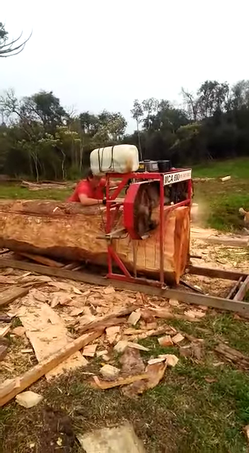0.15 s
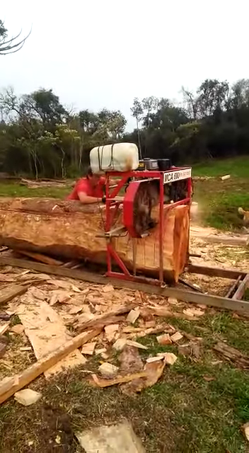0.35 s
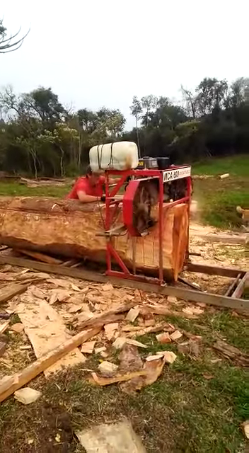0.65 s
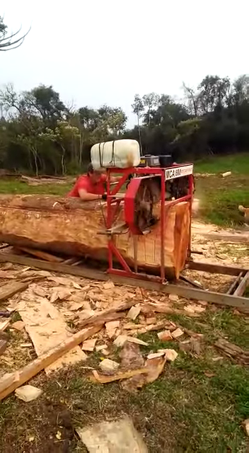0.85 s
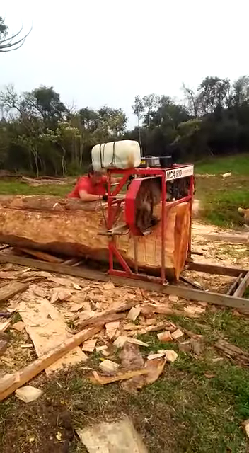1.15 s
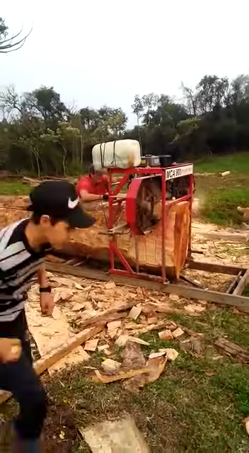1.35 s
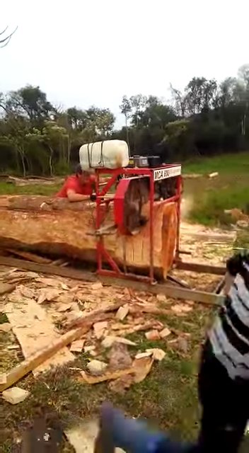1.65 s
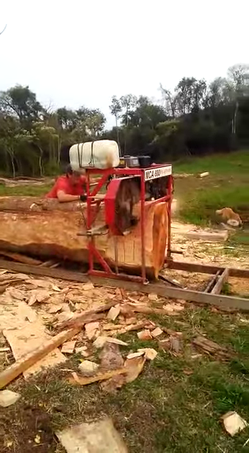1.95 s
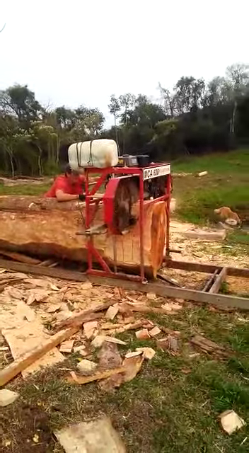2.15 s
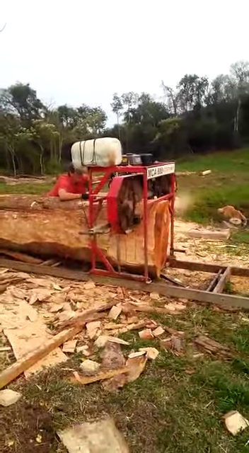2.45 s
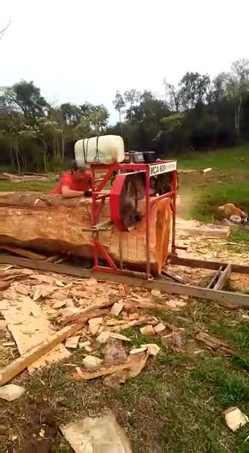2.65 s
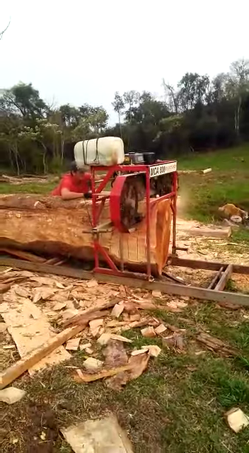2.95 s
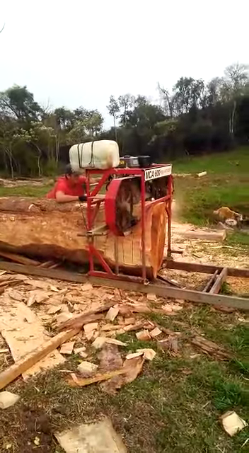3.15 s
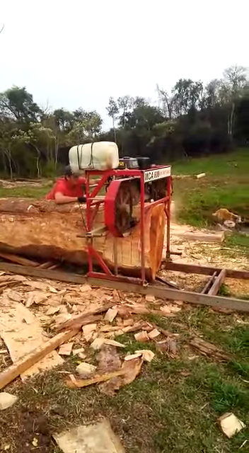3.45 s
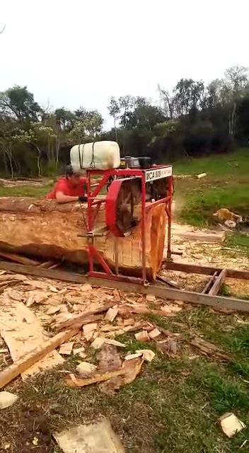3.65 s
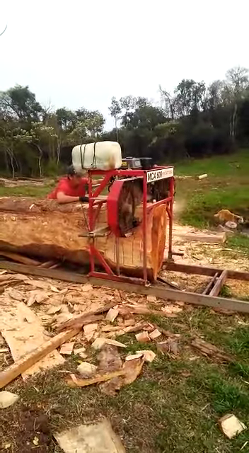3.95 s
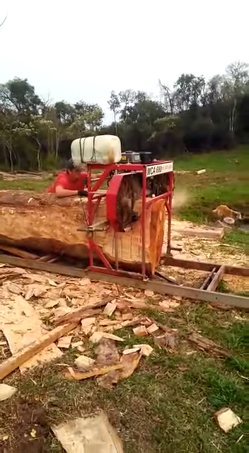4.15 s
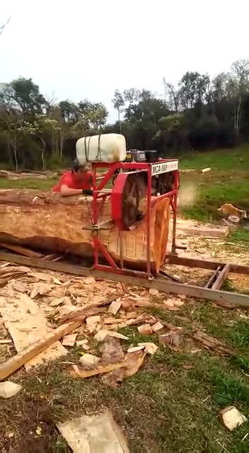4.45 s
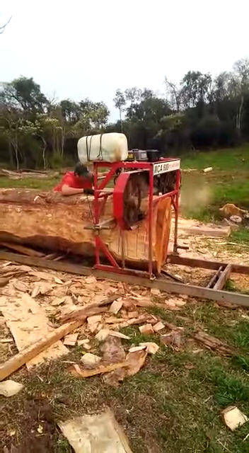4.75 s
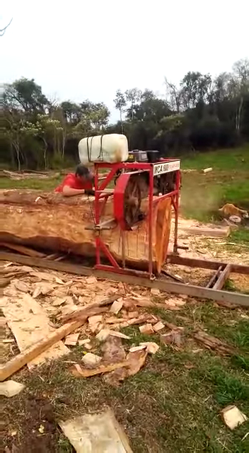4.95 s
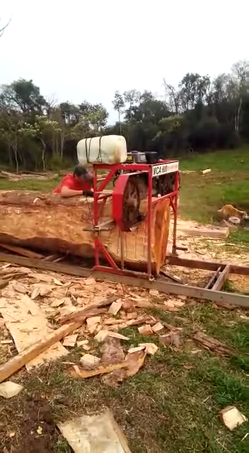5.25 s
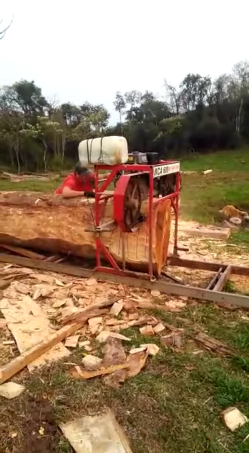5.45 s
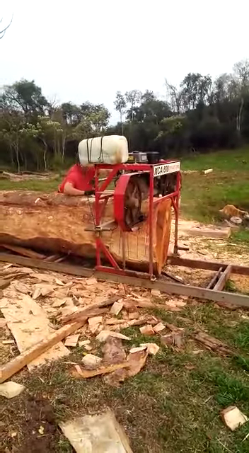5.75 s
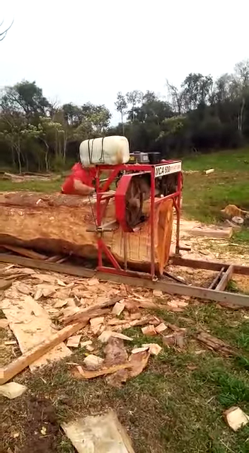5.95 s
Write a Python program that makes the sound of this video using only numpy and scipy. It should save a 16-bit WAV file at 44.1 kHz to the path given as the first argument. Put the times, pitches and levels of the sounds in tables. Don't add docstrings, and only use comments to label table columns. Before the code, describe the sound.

A petrol engine barks steadily under load outdoors while a saw blade rasps through a log, loose metal rattling and wind thumping the microphone.

```python
import sys
import numpy as np
from scipy import signal
from scipy.fft import rfft, irfft, next_fast_len
from scipy.io import wavfile
from scipy.ndimage import uniform_filter1d, map_coordinates

SR = 44100
rng = np.random.default_rng(int(sys.argv[2]) if len(sys.argv) > 2 else 0)


def bounce(signal):
    frames = np.transpose(np.atleast_2d(signal))
    limited = np.clip(frames, -1, 1)
    pcm = np.round(limited * 32767).astype(np.int16)
    wavfile.write(sys.argv[1], SR, pcm)


def volts_from_db(level):
    exponent = np.asarray(level, float) / 20
    return 10 ** exponent


N = 268569

# (frequency [Hz], density [dB per Hz])
BUFFET_SPECTRUM = [(20, -32), (45, -17), (70, -2.5), (170, -6), (320, -10.5), (600, -20.5), (1200, -69)]
# (time [s], peak level [dB], half width [s])
GUSTS = [(.11, -10.5, 0.041), (.27, -15, 0.024), (.66, -15.5, 0.049), (.82, -18, 0.046), (.97, -22, 0.031),
         (1.22, -34, 0.03), (1.47, -13, 0.092), (2.0, -29, 0.044), (2.35, -28, 0.11), (2.62, -24, 0.075),
         (2.91, -6.5, 0.043), (3.09, -12, 0.052), (3.3, -26, 0.097), (3.54, -15, 0.079), (3.76, -26, 0.082),
         (4.02, -14, 0.026), (4.23, -21, 0.037), (4.41, -10.5, 0.036), (4.71, -9.5, 0.064),
         (4.9, -17.5, 0.058), (5.23, -16, 0.059), (5.4, -23, 0.049), (5.78, -19, 0.13)]
# (time [s], peak level [dB], push +1 or suction -1 [-])
PUFFS = [(0.073, -18, -1), (.116, -16, -1), (0.129, -9, -0.89), (0.269, -8, -1), (0.655, -16, 1),
         (0.748, -6, -1), (.921, -10, -1), (0.946, -6, -1), (1.452, -5, 1), (1.537, -10, 1),
         (2.876, -9, -1), (2.901, -16, 1), (2.933, 0, -0.82), (2.942, -9, 1), (3.062, -11, -1),
         (3.085, -6, 1), (3.312, -14, 0.91), (3.436, -13, 1), (3.562, -11, 1), (4.016, -11, -0.91),
         (4.043, -11, 0.83), (4.399, -10, 1), (4.406, -7, 0.74), (4.663, -8, 1), (4.799, -5, -1),
         (4.96, -8, 1), (5.217, -10, 1), (5.781, -12, 1), (5.791, -10, 1)]
CALM_DB, PUFF_MS = -23, 2.8
# (time [s], peak level [dB], length [ms])
SLAP, FORERUNNER = (4.4248, 3, .8), (4.4210, -5.5, .75)

# (frequency [Hz], density [dB per Hz])
SPRAY_SPECTRUM = [(4500, -35), (6000, -10), (7500, -5), (8800, -2), (10200, -6.5), (11500, -11),
                  (13700, -4.5), (15000, -10.5), (15600, -5)]
# (frequency [Hz], density [dB per Hz])
RASP_SPECTRUM = [(2000, 6.5), (2900, 2), (3500, -8.5), (4500, -0.5), (5800, -3.5), (7500, -43)]
# (time [s], dust thrown [dB], bite of the teeth [dB])
FEED = [(0, -45.5, -41), (.33, -35, -39), (.58, -37, -34.5), (.9, -43.5, -41), (1.3, -35, -35.5),
        (1.9, -33.5, -40), (2.22, -32, -39), (2.45, -36, -38), (2.8, -32, -34.5), (3.03, -38, -50),
        (3.45, -32, -41), (4.08, -39, -41), (4.35, -41.5, -37), (4.9, -45, -45.5), (5.05, -42, -49),
        (5.55, -44, -45), (5.76, -37.5, -43), (6.09, -41.5, -42)]
# (time [s], peak level [dB], duration [s])
KNOTS = [(0.247, -40, 0.12), (0.646, -38, 0.062), (0.866, -34, 0.086), (1.003, -32.5, 0.11),
         (1.122, -38, 0.091), (1.372, -38, 0.057), (1.6117, -32, 0.11), (1.737, -36, 0.064),
         (1.939, -48, 0.068), (2.04, -38, 0.07), (2.2, -37, 0.079), (2.346, -38, 0.064), (2.53, -36, 0.1),
         (2.74, -39, 0.11), (3.095, -38, 0.08), (3.28, -40, 0.14), (3.384, -33.5, 0.037),
         (3.652, -45, 0.07), (4.024, -31, 0.059), (4.12, -37, 0.042), (4.377, -38, 0.14),
         (4.9721, -38, 0.067), (5.128, -37, 0.065), (5.391, -33, 0.088), (5.62, -34, 0.041),
         (5.733, -27, 0.062), (5.87, -48, 0.1), (6.004, -27, 0.07)]
KNOT_DB, KNOT_EDGE_S = -13, 0.044
RASP_EARLY, RASP_PULSE = .09, .22
SHADE_S, SHADE_WIDTH_S, SHADE_DB = 1.541, 0.043, -23

# (frequency [Hz], width [Hz], level [dB])
PANEL_MODES = [(1835, 55, 4), (2365, 80, 3), (1435, 50, -7), (2080, 120, -6), (2950, 70, -9)]
# (time [s], peak level [dB], frequency [Hz])
TICKS = [(0.0598, -20, 1820), (0.0972, -19, 1860), (0.172, -14.5, 1820), (0.204, -19, 1850),
         (0.238, -20, 1820), (0.3443, -16, 1830), (0.4394, -27, 1880), (0.481, -17, 1610),
         (0.5525, -16, 1820), (0.6215, -13.5, 1980), (0.6529, -20, 1780), (0.6915, -18, 1660),
         (0.7163, -16, 1630), (0.753, -16, 1630), (0.8235, -22, 1510), (0.931, -11.5, 1860),
         (1.0055, -13, 1810), (1.039, -14, 1840), (1.0705, -15, 1810), (1.1802, -20, 1810),
         (1.2128, -12, 1900), (1.2457, -16, 1920), (1.3418, -21, 1580), (1.3833, -23, 1610),
         (1.4176, -18, 1850), (1.4566, -34, 1610), (1.4895, -24, 1600), (1.7659, -16, 1850),
         (1.8317, -13.5, 1850), (1.9367, -19, 1540), (2.0391, -25, 1820), (2.2503, -29, 1540),
         (2.3101, -32, 1620), (2.4199, -28, 1590), (2.4962, -36, 1860), (2.5298, -26, 1860),
         (2.5691, -20, 1970), (2.604, -30, 1590), (2.807, -37, 1740), (3.3218, -16, 1960),
         (3.3937, -19, 1520), (3.6321, -13, 2290), (3.804, -16, 1790), (3.8397, -15, 1820),
         (3.904, -23, 1890), (4.0466, -32, 1800), (4.1106, -21, 1810), (4.3603, -11, 1840),
         (4.3869, -20, 1480), (4.573, -26, 1840), (4.6394, -15, 1960), (4.707, -20, 1763),
         (4.8429, -34, 1630), (5.0804, -20, 1830), (5.1487, -24, 1830), (5.3896, -17, 1910),
         (5.4874, -24, 1510), (5.7588, -16, 1500), (5.9264, -11, 2090), (6.0023, -19, 1500)]
TICK_DB, TICK_T60_S, TICK_RISE_S = -7.5, 0.08, 0.00086
RATTLE_DB, RATTLE_GROWS, RATTLE_SWAY_DB = -44.5, 0.41, 2.5

# (time [s], rate [cycles per s])
SPEED = [(0.0, 27.92), (0.24, 28.69), (0.66, 28.61), (0.96, 29.1), (1.3, 28.62), (1.6, 28.95),
         (2.22, 29.11), (2.46, 27.65), (3.08, 29.72), (3.54, 29.0), (3.84, 29.33), (4.22, 28.62),
         (4.58, 28.38), (4.76, 29.39), (5.0, 29.5), (5.5, 29.51), (5.8, 30.0), (6.09, 29.71)]
# (time [s], load 0-1 [-])
LOAD = [(0, 1), (2.9, 0.97), (3.02, 0.15), (3.28, 0.26), (3.4, 0.7), (3.6, 0.9), (3.75, 0.46), (3.95, 0.4),
        (4.08, 1), (4.66, 1), (4.78, 0.12), (6.09, 0.02)]
# (time [s], exhaust level [dB])
EFFORT = [(0, -25), (.5, -20), (1.5, -19.5), (2.35, -21), (2.6, -18.5), (2.9, -21), (3.15, -24),
          (3.45, -21), (3.8, -21.5), (4.35, -19), (4.7, -24), (5.3, -22), (5.45, -20), (5.62, -20.5),
          (5.85, -22), (6.09, -21.5)]
# (multiple of the cycle [-], level [dB])
HEAVY_HARMONICS = [(1, -42), (2, -20), (3, -18), (4, -20), (5, -7), (6, -7), (7, -4.5), (8, -23), (9, -4),
                   (10, -3), (11, -7), (12, 1.5), (13, -3.5), (14, -8), (15, -9), (16, -9), (17, -15),
                   (18, -13), (19, -19), (20, -13)]
# (multiple of the cycle [-], level [dB])
LIGHT_HARMONICS = [(1, -39), (2, -19), (3, -20), (4, -17), (5, -4), (6, -11), (7, -17), (8, -6), (9, -11),
                   (10, -15), (11, -1), (12, -3), (13, 0), (14, -5.5), (15, -9), (16, -19), (17, -20),
                   (18, -18), (19, -18), (20, -15)]
# (frequency [Hz], density [dB per Hz])
ROAR_SPECTRUM = [(40, -42), (65, -29), (120, -19), (200, -27), (350, 5), (500, -0.5), (700, -4),
                 (1000, -32), (1200, -17), (1700, -14.5), (2500, -12), (3500, -36)]
# (frequency [Hz], width [Hz], level [dB])
CAN_MODES = [
    (770, 215, 0),
    (862, 175, 0),
]
# (time [s], level over exhaust [dB], share of the higher pitch 0-1 [-])
CAN_LEVEL = [(0, 1.5, .4), (.35, 0, 0.3), (.7, -1, 0.1), (1.05, -1, 0.6), (1.4, -1, 0.4), (1.75, 0, 0.2),
             (2.1, 1.5, 0.3), (2.45, -2, 0.35), (2.8, 1.5, 0.01), (3.1, 0, 0.54), (3.5, 1.5, 0.7),
             (3.85, 1, 0.43), (4.2, 0.5, 0.53), (4.55, -0.5, 0.1), (4.95, 0.5, 0.3), (5.4, 2, 0.33),
             (5.7, 2, 0.46), (6.09, 4.5, 0.7)]
# (time [s], peak level [dB], frequency [Hz])
JOLTS = [(0.134, -9, 844), (0.365, -20, 806), (0.508, -27, 836), (0.583, -3.5, 813), (0.691, -0.5, 833),
         (0.75, -2.5, 757), (0.864, -6, 821), (0.898, -4, 800), (0.933, -1.5, 800), (0.958, -1.5, 830),
         (1.136, -3, 830), (1.178, -11, 694), (1.42, -5, 917), (1.455, -4.5, 755), (1.485, -6.5, 810),
         (1.686, -5, 765), (1.727, -1.5, 800), (1.768, -3.5, 836), (1.928, -5, 840), (2.03, -1, 806),
         (2.081, -6, 780), (2.136, -4, 859), (2.177, -2, 813), (2.388, -18, 810), (2.599, -7, 807),
         (2.63, -9.5, 747), (2.71, -9, 770), (2.74, -2.5, 780), (2.846, -1, 838), (3.083, -14, 666),
         (3.154, -6.5, 880), (3.224, -9, 790), (3.383, -9.5, 787), (3.502, -3.5, 850), (3.624, -4, 833),
         (3.735, -6.5, 920), (3.795, -2, 827), (3.839, -31, 875), (3.941, -4, 815), (4.011, -4, 806),
         (4.042, -2, 760), (4.175, -9, 850), (4.224, -6, 893), (4.326, -6, 734), (4.391, -14, 766),
         (4.913, -8, 794), (5.082, -1.5, 744), (5.219, -9, 860), (5.346, -6, 864), (5.383, -9, 840),
         (5.454, -14, 860), (5.476, -20, 810), (5.576, -6, 850), (5.661, -3, 853), (5.691, -9, 886),
         (5.722, -2.5, 845), (5.82, -12, 714), (5.92, -0.5, 880), (6.019, 0.5, 854)]
JOLT_DB, JOLT_T60_S, JOLT_RISE_S = -.5, 0.036, .003
DIP_SHARE, DIP_S = .35, .005
BARK_EARLY, BARK_SWAY_DB = .18, 1
LUG_HZ, LUG_DB, LUG_LAG_S = 28.7, 5, 0.21
THUMP_TOP, THUMP_LAG = 8, .19
HALF_ECHO, CRACK_TURN = .45, -1.6

# (frequency [Hz], left minus right [dB])
BALANCE = [(60, 15.5), (110, 0.5), (200, 5.5), (380, 1.5), (700, -0.5), (1290, -3), (2380, -4.5),
           (4400, 3.5), (8120, 1.5), (15000, -7.5)]
# (frequency [Hz], extra lead of the left [rad])
GROUND = [(150, -3.7), (260, -4.4), (340, -4.0), (450, -3.2), (500, -1.6), (620, 1.0), (800, 1.3),
          (1050, 1.2), (1300, 0), (1700, -.6), (2000, .7), (2300, .2), (2700, -.17), (3300, 0)]
# (frequency [Hz], unrelated share 0-1 [-])
DIFFUSE = [(400, .03), (520, .4), (650, .03), (1100, .05), (1400, .3), (2200, .1), (2600, .02), (6500, .02),
           (7900, .3), (10500, .36), (15000, .38)]
# (time [s], depth [dB])
DUCKS = [
    (0, 0.5),
    (.6, 2.5),
    (2.618, 2.5),
    (2.94, 1.5),
    (3.589, 4),
    (4.4265, 7),
]
RECOVER_S = 0.32
PORT_GAP_S, TURN_S = 1 / 2580, .000007
TOP_HZ = 15630


def unit(x):
    return x / np.sqrt(np.mean(x ** 2) + 1e-20)


def along(points, hz):
    f, v = np.transpose(points)
    return np.interp(np.log(hz + 1), np.log(f + 1), v)


def curves(rows):
    s, *cols = np.transpose(rows)
    return [np.interp(np.arange(N) / SR, s, c) for c in cols]


def wobble(rate):
    return map_coordinates(rng.standard_normal(int(N * 300 / SR)), [np.arange(N) * rate / SR])


def filtered(x, response):
    m = next_fast_len(N + SR // 4)
    return irfft(rfft(x, m) * response(np.fft.rfftfreq(m, 1 / SR)), m)[..., :N]


def resonant(x, modes):
    def response(f):
        return sum((-1) ** k * volts_from_db(db) * 1j * f * width / (hz * hz - f * f + 1j * f * width)
                   for k, (hz, width, db) in enumerate(modes))
    return unit(filtered(x, response))


def hiss(spectrum, patchy_db):
    z = signal.stft(rng.standard_normal(N), nperseg=512)[2]
    field = rng.standard_normal(z.shape)
    field = uniform_filter1d(uniform_filter1d(field, 8, 0), 10, 1)
    x = signal.istft(z * volts_from_db(patchy_db * unit(field)), nperseg=512)[1][:N]
    return unit(filtered(x, lambda hz: volts_from_db(along(spectrum, hz))))


def knocks(turns, scatter_s, spread_db):
    at = np.flatnonzero(np.diff(np.floor(turns)))
    chance = rng.standard_normal((len(at), 2))
    where = np.clip(at + scatter_s * SR * chance[:, 0], 0, N - 1).astype(int)
    return np.bincount(where, volts_from_db(spread_db * chance[:, 1]), N)


def struck(table, gain_db, t60_s, rise_s):
    s, db, hz = np.transpose(table)[:, :, None]
    t = np.arange(SR // 20) / SR
    decay = volts_from_db(db + gain_db - 60 * t / t60_s)
    rings = decay * (1 - np.exp(-t / rise_s)) * np.sin(2 * np.pi * hz * t)
    where = np.round(s * SR).astype(int) + np.arange(len(t))
    return np.bincount(where.ravel(), rings.ravel(), N + SR)[:N]


def shade(share):
    t = np.arange(N) / SR
    return volts_from_db(share * SHADE_DB * np.exp(-((t - SHADE_S) / SHADE_WIDTH_S) ** 2 / 2))


def eddy(s, db, ms):
    near = np.arange(round(s * SR) - 600, round(s * SR) + 600)
    u = (near / SR - s) / (ms / 2000)
    return near, volts_from_db(db) * (1 - u * u) * np.exp(-u * u / 2)


def wind():
    t = np.arange(N) / SR
    gust = volts_from_db(CALM_DB) + sum(volts_from_db(db) * np.exp(-((t - s) / wide) ** 2 / 2) for s, db, wide in GUSTS)
    lumpy = unit(volts_from_db(1.4 * wobble(22.8)) * hiss(BUFFET_SPECTRUM, patchy_db=3.5))
    buffet = gust * volts_from_db(-5.5) * lumpy
    for s, db, push in PUFFS:
        near, lump = eddy(s, db + 2.5, PUFF_MS)
        buffet[near] += push * lump
    lean = .025 * wobble(12) - .04
    high_pass = lambda hz: 1 / (1 + (90 / (hz + 1)) ** 2)
    stray = gust * volts_from_db(-15) * filtered(hiss(BUFFET_SPECTRUM, patchy_db=1.0), high_pass)
    air = np.array([stray + (1 + lean) * buffet, stray - (1 - lean) * buffet])
    near, lump = eddy(*SLAP)
    air[1, near] += lump
    air[0, near + round(PORT_GAP_S * SR)] -= .72 * lump
    near, lump = eddy(*FORERUNNER)
    air[:, near] += lump
    return air


def grain_knots():
    s, db, lasts = np.transpose(KNOTS)

    def steps(at):
        where = np.round(at * SR).astype(int)
        return np.cumsum(np.bincount(where, volts_from_db(db + KNOT_DB), N + SR))[:N]
    pulses = steps(s) - steps(s + np.abs(lasts))
    return np.abs(uniform_filter1d(pulses, round(KNOT_EDGE_S * SR)))


def blade(cycle):
    spray_db, rasp_db = curves(FEED)
    shared_db = .7 * wobble(8) + 1.1 * wobble(150)
    shaft = 3.93 * cycle
    flutter = 1 + .08 * np.cos(2 * np.pi * cycle)
    flutter = flutter + .16 * np.cos(2 * np.pi * shaft) + .12 * np.cos(4 * np.pi * shaft)
    bite = flutter * volts_from_db(shared_db)
    spray = unit(bite * hiss(SPRAY_SPECTRUM, patchy_db=0.5))
    beat = 1 + RASP_PULSE * np.cos(2 * np.pi * (cycle + RASP_EARLY))
    rasp = unit(beat * bite * hiss(RASP_SPECTRUM, patchy_db=2.5))
    knots = grain_knots()
    dust = shade(0.74) * (volts_from_db(spray_db - 2.0) + knots) * spray
    teeth = shade(0.57) * (volts_from_db(rasp_db + 3.5 + 0.56 * wobble(8.8)) + 0.94 * knots) * rasp
    return dust + teeth


def frame(cycle):
    bite_db = curves(FEED)[1] + 40
    level = shade(0.91) * volts_from_db(RATTLE_DB + RATTLE_GROWS * bite_db + RATTLE_SWAY_DB * wobble(4.05))
    hum = np.zeros(N)
    for k, (hz, width, db) in enumerate(PANEL_MODES):
        blows = unit(knocks(cycle + .37 * k, scatter_s=.0008, spread_db=2.5))
        shake = blows + .4 * rng.standard_normal(N)
        hum += volts_from_db(db) * resonant(shake, [(hz, width, 0)])
    ticks = struck(TICKS, TICK_DB, TICK_T60_S, TICK_RISE_S)
    soft = lambda hz: 1 / (1 + (hz / 2750) ** 8)
    return filtered(level * unit(hum) + ticks, soft)


def exhaust_note(cycle, load):
    late_speed = np.roll(curves(SPEED)[0], round(LUG_LAG_S * SR))
    lug_db = LUG_DB * np.clip(LUG_HZ - late_speed, 0, 2)
    note = np.zeros(N)
    hunt = .005 * (1.2 - load) * wobble(18)
    for (k, heavy_db), (_, light_db) in zip(HEAVY_HARMONICS, LIGHT_HARMONICS):
        sway_db = (1.8 - .9 * load) * wobble(8)
        slip = (.3 - .12 * load) * k / 13 * wobble(11)
        if k <= THUMP_TOP:
            phase = -2 * np.pi * THUMP_LAG * (k - 5.4)
        else:
            phase = HALF_ECHO * (1 - np.cos(np.pi * k)) * (1 + (k == 11))
        if k < 5 or k > THUMP_TOP:
            phase += CRACK_TURN
        level_db = load * heavy_db + (1 - load) * light_db + sway_db
        level_db = level_db + lug_db * ((k < 5) + .6 * (k == 7))
        note += volts_from_db(level_db) * np.cos(2 * np.pi * k * (cycle + hunt) + phase + slip)
    return note / np.sqrt(np.abs(uniform_filter1d(note ** 2, SR // 4)) + 1e-9)


def gas_pulse(cycle, early):
    pulse = 1 + .22 * np.cos(2 * np.pi * cycle) + .15 * np.cos(2 * np.pi * 3 * cycle)
    return np.roll(pulse, -round(early * SR / 29))


def silencer_can(cycle, exhaust_db):
    can_db, high_share = curves(CAN_LEVEL)
    high_share = np.clip(high_share, 0, 1)
    bark_db = exhaust_db + can_db + BARK_SWAY_DB * wobble(6.4)
    firing = knocks(3 * (cycle + BARK_EARLY), scatter_s=.0001, spread_db=2)
    gas = gas_pulse(cycle, BARK_EARLY) ** .55 * volts_from_db(.3 * wobble(30)) * rng.standard_normal(N)
    drive = volts_from_db(-11.0) * unit(firing) + gas
    heavy, light = (resonant(resonant(drive, [mode]), [mode]) for mode in CAN_MODES)
    bark = volts_from_db(bark_db) * (np.sqrt(1 - high_share) * heavy + np.sqrt(high_share) * light) / np.sqrt(2)
    starts = np.bincount(np.round(np.transpose(JOLTS)[0] * SR).astype(int), minlength=N)
    dip = np.exp(-(np.arange(-SR // 40, SR // 40) / SR / DIP_S) ** 2 / 2)
    lull = 1 - DIP_SHARE * signal.fftconvolve(starts, dip, 'same')
    return bark * lull + struck(JOLTS, JOLT_DB, JOLT_T60_S, JOLT_RISE_S)


def engine(cycle):
    exhaust_db = curves(EFFORT)[0]
    load = np.clip(curves(LOAD)[0], 0, 1)
    roar = unit(gas_pulse(cycle, RASP_EARLY) * hiss(ROAR_SPECTRUM, patchy_db=1.0))
    note = volts_from_db(1.0) * exhaust_note(cycle, load) + volts_from_db(-6.5) * roar
    return volts_from_db(exhaust_db) * note + silencer_can(cycle, exhaust_db)


def ports(x):
    side = np.array([[.5], [-.5]])
    lead = lambda hz: np.pi + 2 * np.pi * hz * PORT_GAP_S + along(GROUND, hz)
    share = lambda hz: along(DIFFUSE, hz)
    z = signal.stft(x, nperseg=512)[2]
    turns = rng.random((2,) + z.shape)
    scattered = signal.istft(z * np.exp(2j * np.pi * turns), nperseg=512)[1][:, :N] * np.sqrt(2)
    direct = filtered(x, lambda hz: np.sqrt(1 - share(hz)) * np.exp(1j * side * lead(hz)))
    turned = np.arange(N) + TURN_S * SR * wobble(3)
    direct[0] = map_coordinates(direct[0], [turned], mode='nearest')
    both = direct + filtered(scattered, lambda hz: np.sqrt(share(hz)))
    return filtered(both, lambda hz: volts_from_db(side * along(BALANCE, hz)))


def gain_control():
    t = np.arange(N) / SR
    duck_db = sum(db * (t >= s) * np.exp(-np.abs(t - s) / RECOVER_S) for s, db in DUCKS)
    return volts_from_db(-uniform_filter1d(duck_db, size=200))


def scene():
    air = wind()
    cycle = np.cumsum(curves(SPEED)[0]) / SR + .01
    mill = blade(cycle) + frame(cycle) + engine(cycle)
    return ports(mill) + air


def top_cut(x):
    return signal.sosfilt(signal.butter(12, 15890, fs=SR, output="sos"), x)


def record(dry):
    x = filtered(dry * gain_control(), lambda hz: (1j * hz / (1j * hz + 38)) ** 3)
    x = x / (1 + np.abs(x / .98) ** 8) ** (1 / 8)
    mix = filtered(x, lambda hz: hz < TOP_HZ)
    return top_cut(mix)


dry = scene()
out = record(dry)
bounce(out)
```